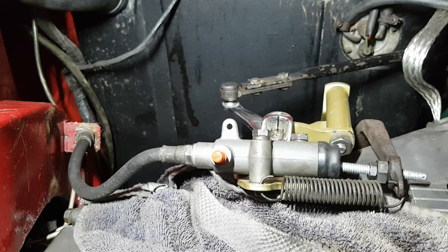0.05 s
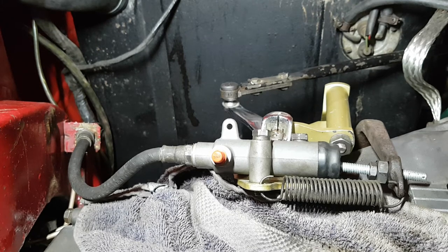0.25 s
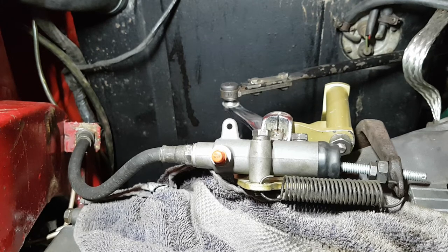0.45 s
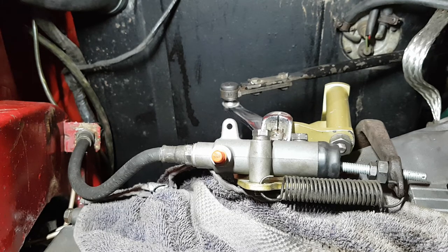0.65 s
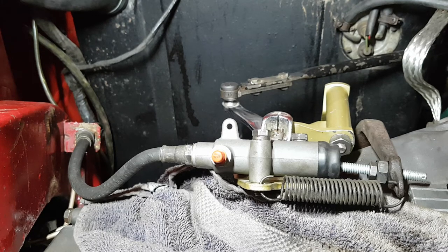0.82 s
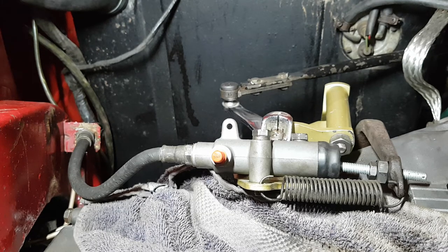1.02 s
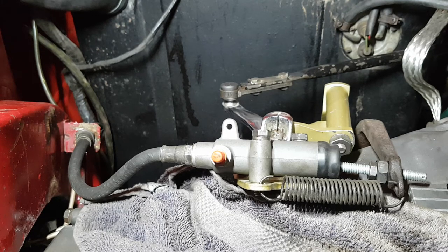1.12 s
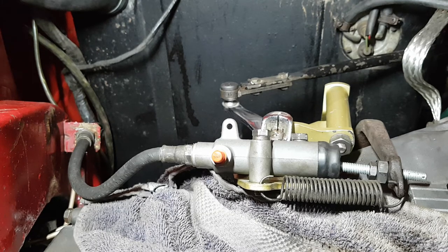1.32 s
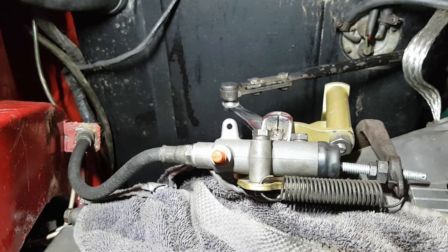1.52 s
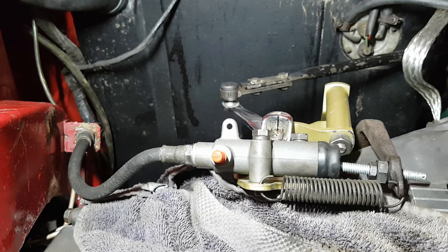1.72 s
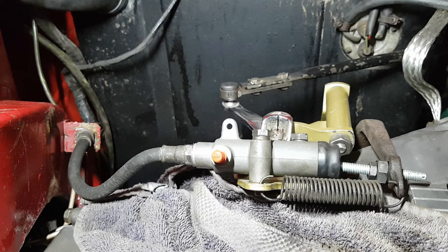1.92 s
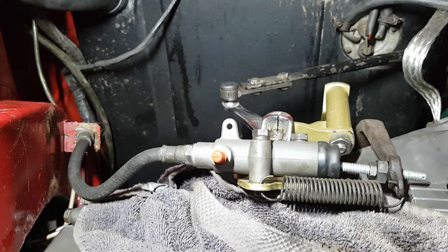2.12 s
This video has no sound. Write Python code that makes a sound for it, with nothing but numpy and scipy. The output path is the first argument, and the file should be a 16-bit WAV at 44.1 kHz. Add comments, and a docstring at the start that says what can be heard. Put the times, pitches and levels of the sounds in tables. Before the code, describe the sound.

A clutch linkage is worked once, close up in a car's engine bay. A scuff and a booming double thud lead into rubbing, spring ticks and a brief groan, then light knocks and a dry click over faint workshop noise.

```python
"""A clutch linkage is worked once in a car's engine bay, heard close up over faint workshop noise.
A scuff opens, the metalwork sings and the linkage starts to rub; then a double thud booms through the
body shell and a faint hiss lingers. Soft knocks and more scuffs follow the travel, the return spring
ticks and the pivot groans briefly as it sticks and slips. After one last scuff the rubbing dies away
under a few light knocks, with one dry click near the end."""
import sys
import numpy as np
from scipy import signal
from scipy.fft import rfft, irfft
from scipy.io import wavfile
from scipy.ndimage import uniform_filter1d

SR = 44100
rng = np.random.default_rng(int(sys.argv[2]) if len(sys.argv) > 2 else 0)


def wav_record(signal):
    """Record a signal, one row per channel, as 16-bit PCM in the file named by sys.argv[1]."""
    frames = np.transpose(np.atleast_2d(signal))
    bounded = np.clip(frames, -1, 1)
    # unit amplitude maps onto the largest positive 16-bit level
    quanta = np.round(bounded * 32767).astype(np.int16)
    wavfile.write(sys.argv[1], SR, quanta)


N = 94815
T = np.arange(N) / SR

# Noise colours. Each row: frequency in Hz, relative level in dB.
ROOM_TONE_EQ = [(15, -33.5), (29, 2), (40, -19.5), (58, -1.5), (90, -1.5), (135, -1.5), (253, -15.5),
                (500, -24.5), (650, -22), (1100, -28), (2500, -32.5), (5000, -41.5), (9000, -47),
                (15500, -38.5)]
RUB_EQ = [(80, -8), (170, 2), (285, 2), (400, -4), (515, -11), (590, -7), (900, -16), (1150, -15),
          (1400, -22), (1950, -23), (2800, -28.5), (4500, -33.5), (8000, -51.5), (15000, -60)]
SHELL_RUMBLE_EQ = [(25, -37), (55, -2), (80, -0.5), (105, -1), (128, 5.5), (160, 1.5), (220, -10),
                   (400, -56.5)]
SCUFF_BODY_EQ = [(100, -25), (280, 6.5), (400, 3), (660, 1), (1250, -7.5), (1650, -7.5), (2600, -14),
                 (4500, -25.5), (9000, -32.5), (15000, -37)]
HISS_EQ = [(1500, -34), (3200, -8), (4400, 1), (7000, -3.5), (10000, -16), (14000, -13.5), (16000, -28.5)]
PANEL_RATTLE_EQ = [(60, -24.5), (150, -7.5), (250, 4), (400, -2), (520, -10.5), (720, -4), (1200, -18.5),
                   (2500, -29), (5000, -45), (12000, -74)]
KNOCK_RATTLE_EQ = [(100, -31), (230, 5.5), (380, -2), (465, -4), (700, -8), (1100, -21.5), (2500, -35),
                   (5000, -43), (12000, -70)]
TICK_CRACK_EQ = [(800, 1), (2500, -2), (4800, 5.5), (6500, 2), (7800, -3), (8900, 3), (9800, -11),
                 (10800, 6), (12500, -4), (15500, -4.5)]

# Modes of the struck parts. Each row: frequency in Hz, relative level in dB, t60 in seconds.
SHELL_MODES = [(55.47, -10, 0.75), (80.7, 4.5, 0.26), (104.3, 6.5, 0.45), (130.04, 9, 0.57),
               (151.4, -19.5, 0.81), (206.4, -15, 0.47), (294, -20, 0.71), (381.7, -25.5, 0.32),
               (452.4, -19.5, .2), (611, -24.5, 0.23), (693, -13, 0.2), (732, -10.5, 0.098),
               (973, -33, 0.46)]
MOUNT_MODES = [(88.5, -9, 0.12), (125.2, -2.5, 0.43), (144.7, 2, .2), (170.5, 4, 0.23), (226.5, -11, 0.29)]
SPRING_MODES = [(3910, -19, .12), (4350, -18, .12), (5050, -16, .12), (6400, -21, .1), (6690, -20, .1),
                (7600, -22, .08), (8550, -21, .09), (9130, -22, .09), (10690, -11, .08), (11900, -24, .08)]

# Effort along the linkage's travel. Each row: time in seconds, rub in dB, shell rumble in dB.
TRAVEL_LEVELS = [(0, -66, -58.5), (.12, -52.5, -57.5), (.21, -69.5, -61), (.42, -60, -49.5),
                 (.59, -87.5, -66.5), (0.669, -59.5, -41.5), (.745, -61.5, -50), (0.791, -46.5, -43),
                 (.89, -46.5, -48.5), (.96, -45.5, -41), (1.03, -46.5, -49.5), (1.071, -39.5, -40),
                 (1.161, -43.5, -36), (1.24, -52.5, -46), (1.42, -48.5, -48.5), (1.51, -52, -41),
                 (1.58, -59.5, -49.5), (1.87, -64, -59), (2.15, -86, -63)]
# Quick scuffs, and a faint, slowly fading hiss after the thud (second and third rows).
# Each row: peak time, attack and release t60 in seconds, body in dB, hiss in dB.
SCUFF_AND_HISS_CUES = [(.008, 0.076, 0.28, -45.5, -62.5), (.46, .12, 0.66, -74, -81),
                       (.67, 0.053, 0.53, -73, -78.5), (.838, 0.064, 0.21, -52, -73),
                       (1.212, 0.069, 0.24, -52, -61.5), (1.352, 0.025, 0.22, -43, -50.5)]
# Singing metalwork. Each row: peak time, attack and release t60 in seconds, pitch and width in Hz,
# level in dB.
SING_CUES = [(.015, 0.021, 0.38, 383.3, 27.6, -48.5), (.02, 0.023, 1, 712, 72.2, -60),
             (.838, 0.013, .2, 513, 109, -47), (1.17, 0.052, 0.79, 1960, 423, -57),
             (1.352, 0.031, 0.21, 661, 70.5, -45), (1.352, 0.015, 0.067, 1630, 70, -64),
             (1.347, .005, .06, 4500, 200, -61)]
# Heavy blows on the shell. Each row: time in seconds, force in dB, contact in seconds, rattle in dB.
THUD_CUES = [(0.2357, -28, 0.00025, -46.5), (0.24, -14.5, .0024, -42.5), (0.2989, -36.5, 0.00023, -50)]
# The linkage hits the ends of its play. Each row: start in seconds, thump in dB, rattle in dB.
KNOCK_CUES = [(0.633, -58, -70), (.655, -54.5, -73), (0.692, -50, -66), (1.06, -42.5, -56),
              (1.122, -49, -64), (1.144, -39.5, -60), (1.483, -47, -40), (1.685, -54.5, -80),
              (1.945, -58, -54.5), (1.974, -49.5, -55), (1.99, -44.5, -68), (2.133, -54, -80)]
# Ticks of the return spring. Each row: start in seconds, level in dB.
TICK_CUES = [(.872, -55.5), (0.998, -59.5), (1.005, -59), (1.0095, -60.5), (1.031, -59.5), (1.0738, -56.5),
             (1.077, -50), (1.082, -61), (1.1376, -50), (1.2035, -63)]
# The pivot's groan. Each row: time in seconds, pitch in Hz, level in dB.
GROAN_CURVE = [(1.13, 178, -56), (1.165, 197, -38.5), (1.205, 198, -36.5), (1.245, 188, -38.5),
               (1.272, 184, -53), (1.32, 168, -54), (1.36, 162, -70)]
# Its harmonics. Each row: multiple of the pitch, relative level in dB.
GROAN_HARMONICS = [(1, 0), (2, -11), (3, -26), (4, -28)]

RATTLE_RISE_S = 0.0092


def amp(db):
    """Decibels to gain."""
    return 10 ** (np.asarray(db) / 20)


def unit(x):
    """Scale to rms 1."""
    return x / np.sqrt(np.mean(x ** 2))


def colour(x, eq):
    """Shape a sound by (Hz, dB) points; rms 1."""
    hz, db = np.array(eq, float).T
    f = np.maximum(np.fft.rfftfreq(N, 1 / SR), 1)
    gain = amp(np.interp(np.log(f), np.log(hz), db))
    return unit(irfft(rfft(x) * gain, N))


def low_cut(x, hz, order=3):
    """Roll off the bass."""
    return signal.sosfilt(signal.butter(order, hz, "high", fs=SR, output="sos"), x)


def spread(pair, wide_hz=750):
    """Two unrelated signals to left and right: centred in the bass, wide in the treble."""
    f = np.fft.rfftfreq(N, 1 / SR)
    side = irfft(rfft(pair[1]) * f / np.hypot(f, wide_hz), N)
    return np.array([pair[0] + side, pair[0] - side])


def noise(eq):
    """Stereo noise of a given colour."""
    return colour(spread(rng.standard_normal((2, N))), eq)


def wander(rate_hz):
    """Smooth random drift; rms 1."""
    size = max(int(SR / rate_hz), 2)
    return unit(uniform_filter1d(uniform_filter1d(rng.standard_normal(N), size), size))


def fade(start, t60):
    """Hard attack, exponential decay."""
    return (T >= start) * np.exp(-np.log(1000) * np.maximum(T - start, 0) / t60)


def swell(peak, attack, t60):
    """Smooth rise to a peak, then exponential decay."""
    return np.where(T < peak, np.exp(-((T - peak) / attack) ** 2), fade(peak, t60))


def ring(modes, start=0):
    """Damped modes struck at a given time."""
    return sum(amp(db) * fade(start, t60) * np.sin(2 * np.pi * hz * (T - start))
               for hz, db, t60 in modes)


def convolve(x, response):
    """Pass a sound through a response."""
    return irfft(rfft(x, 2 * N) * rfft(response, 2 * N))[..., :N]


def push(time, contact):
    """Bell-shaped contact force of unit area: the longer, the duller."""
    force = np.exp(-.5 * ((T - time) / contact) ** 2)
    return force / force.sum()


def friction(eq, slips_per_s=1500, uneven_db=1, smear_t60=0.02):
    """Dense slips of uneven size, smeared by reflections in the engine bay."""
    slips = (rng.random(N) < slips_per_s / SR) * amp(uneven_db * rng.standard_normal(N))
    energy = np.maximum(convolve(slips ** 2, fade(0, smear_t60 / 2)), 0)
    grain = np.sqrt(energy) * rng.standard_normal((2, N))
    return colour(spread(grain), eq)


def rubbing(flutter_db=1):
    """The moving linkage rubs and sets the shell rumbling."""
    times, rub_db, rumble_db = np.array(TRAVEL_LEVELS).T
    rub = amp(np.interp(T, times, rub_db) + flutter_db * wander(52.5)) * friction(RUB_EQ)
    rumble = amp(np.interp(T, times, rumble_db)) * friction(SHELL_RUMBLE_EQ)
    return rub + rumble


def scuffs_and_hiss(hiss_attack_share=0.27):
    """Quick scuffs, and a faint, slowly fading hiss after the thud; each has a body and a bright top."""
    body, hiss = friction(SCUFF_BODY_EQ), friction(HISS_EQ)
    out = 0
    for peak, attack, t60, body_db, hiss_db in SCUFF_AND_HISS_CUES:
        out += amp(body_db) * swell(peak, attack, t60) * body
        out += amp(hiss_db) * swell(peak, attack * hiss_attack_share, t60) * hiss
    return out


def singing():
    """Sliding parts excite narrow resonances of the metalwork."""
    out = 0
    for peak, attack, t60, hz, width, db in SING_CUES:
        band = [(hz / 2, -50), (hz * hz / (hz + width), -13), (hz, 0), (hz + width, -13), (hz * 2, -50)]
        out += amp(db) * swell(peak, attack, t60) * noise(band)
    return out


def thuds(cut_hz=35.3, rattle_t60=0.2):
    """Padded blows boom through the body shell and rattle its panels."""
    force = sum(amp(db) * push(time, contact) for time, db, contact, _ in THUD_CUES)
    # Neighbouring modes oppose, so the boom blooms after the hit.
    shell = sum((-1) ** k * ring([mode]) for k, mode in enumerate(SHELL_MODES))
    boom = low_cut(convolve(force, shell), cut_hz)  # the shell radiates little sub-bass
    lean_right = amp([[-0.8], [0.8]])
    shake = sum(amp(db) * swell(time + RATTLE_RISE_S, RATTLE_RISE_S, rattle_t60)
                for time, _, _, db in THUD_CUES)
    return boom * lean_right + shake * noise(PANEL_RATTLE_EQ)


def knocks(cut_hz=85, rattle_t60=0.16):
    """Light, cushioned knocks ring the mounting with a short rattle."""
    mount = sum(amp(db) * ring(MOUNT_MODES, start) for start, db, _ in KNOCK_CUES)
    cushion = np.hanning(64)
    thump = low_cut(convolve(mount, cushion / cushion.sum()), cut_hz)
    shake = sum(amp(db) * swell(start + RATTLE_RISE_S, RATTLE_RISE_S, rattle_t60)
                for start, _, db in KNOCK_CUES)
    return thump + shake * noise(KNOCK_RATTLE_EQ)


def spring_ticks(crack_db=2.5, crack_t60=0.041, tail_db=-28, tail_t60=0.092):
    """The spring's coils snap past each other: a crack and a brief ring, different left and right."""
    crack = amp(crack_db) * noise(TICK_CRACK_EQ)
    out = 0
    for start, db in TICK_CUES:
        polarity = rng.choice([-1, 1], (2, len(SPRING_MODES)))
        coils = polarity @ np.array([ring([mode], start) for mode in SPRING_MODES])
        snap = fade(start, crack_t60) + amp(tail_db) * fade(start, tail_t60)
        out += amp(db) * (coils + crack * snap)
    return out


def pivot_groan(pitch_jitter=.008, waver_db=1):
    """Under the greatest load the pivot sticks and slips at a pitch."""
    times, hz, db = np.array(GROAN_CURVE).T
    pitch = np.interp(T, times, hz) * (1 + pitch_jitter * wander(140))
    phase = 2 * np.pi * np.cumsum(pitch) / SR
    tone = sum(amp(level) * np.sin(k * phase) for k, level in GROAN_HARMONICS)
    gain = amp(np.interp(T, times, db) + waver_db * wander(50))
    gate = (T > times[0]) & (T < times[-1])
    return unit(tone) * gain * gate


def click(start=1.9732, db=-40.5, decay_s=.0012):
    """One dry click with no ring."""
    return -amp(db) * (T >= start) * np.exp(-np.maximum(T - start, 0) / decay_s)


def workshop(x, wet_db=-9, predelay_s=0.0096, t60=0.23, cut_hz=216):
    """Add diffuse reflections from the walls, thin in the bass."""
    tail = spread(rng.standard_normal((2, N))) * fade(predelay_s, t60)
    response = unit(low_cut(tail, cut_hz, order=2)) / np.sqrt(N)
    return x + amp(wet_db) * convolve(x, response)


def scene(room_tone_db=-57):
    """The linkage in the workshop, with the groan and the click close and dry, over the room tone."""
    linkage = thuds() + knocks() + rubbing() + singing() + scuffs_and_hiss() + spring_ticks()
    return workshop(linkage) + pivot_groan() + click() + amp(room_tone_db) * noise(ROOM_TONE_EQ)


def record(dry):
    """A steep low-pass trims the air above 15.8 kHz."""
    return signal.sosfilt(signal.ellip(10, .2, 80, 15800, fs=SR, output="sos"), dry)


dry = scene()
out = record(dry)
wav_record(out)
```